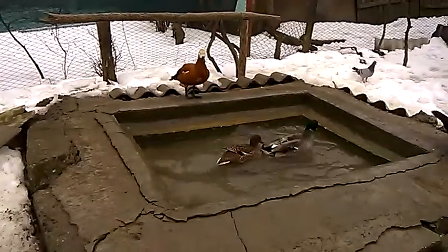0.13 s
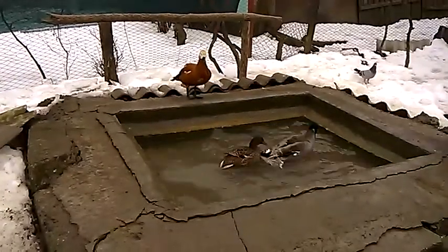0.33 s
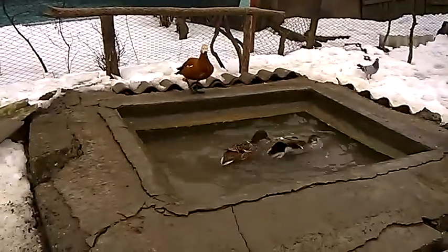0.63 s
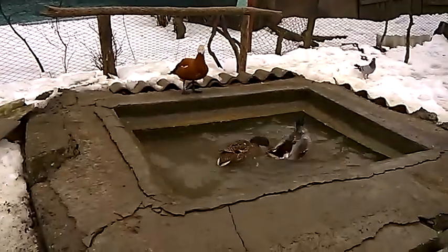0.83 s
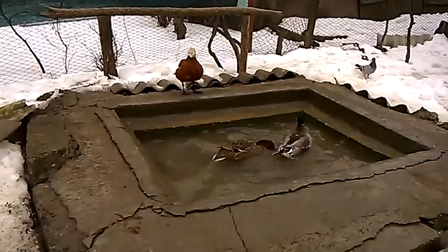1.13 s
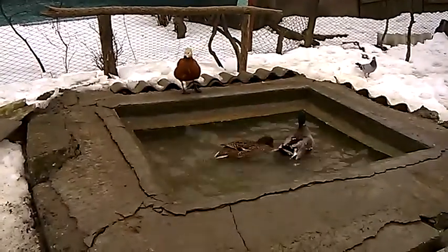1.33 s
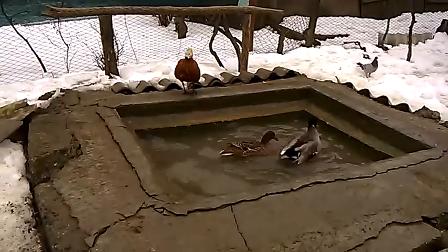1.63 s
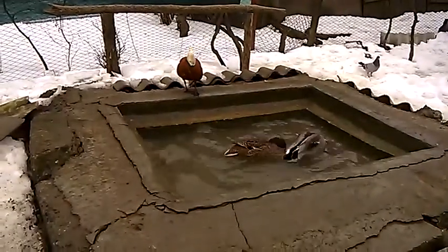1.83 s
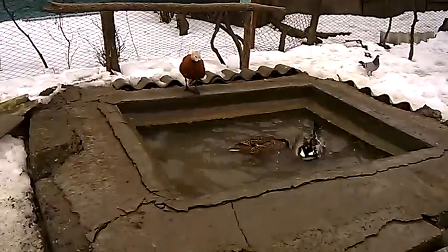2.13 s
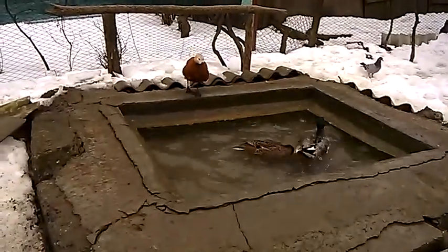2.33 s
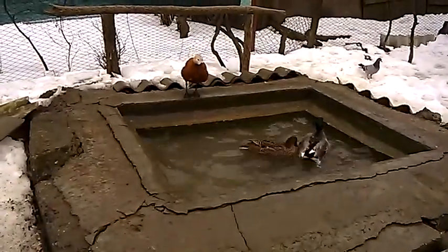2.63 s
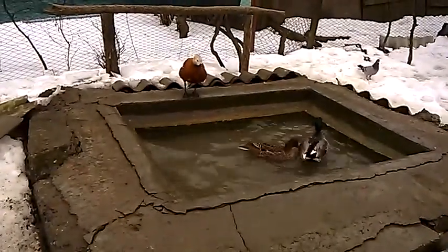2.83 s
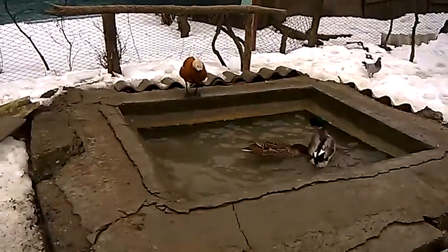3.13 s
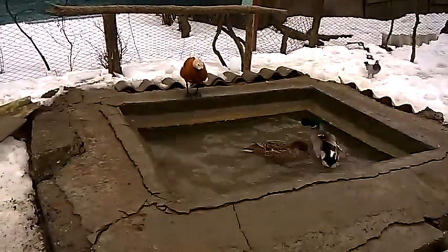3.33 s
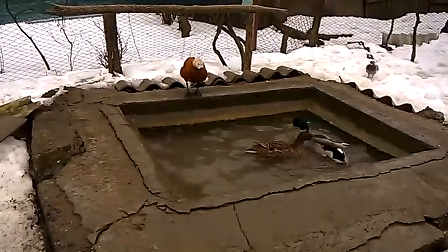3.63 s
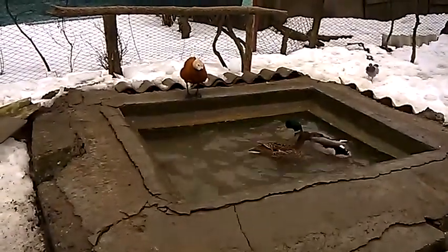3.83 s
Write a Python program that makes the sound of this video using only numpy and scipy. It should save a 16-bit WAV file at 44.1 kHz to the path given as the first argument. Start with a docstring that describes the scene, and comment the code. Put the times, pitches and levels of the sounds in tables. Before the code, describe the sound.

A duck's honk, very loud, is already sounding at the start; a quieter rising honk follows, then a tiny cluck and a third honk, over faint paddling, drips and wind in an outdoor concrete pond.

```python
"""A duck on the rim of a small concrete pond is already honking, with the walls ringing after each call,
two ducks paddling (filtered noise and chirping bubbles) and low wind noise lumping on the microphone.
A distant pigeon coos in gliding sine tone; drips ring as decaying sines, drops tick as noise bursts, and
two-voiced sparrow chirps come from far off. A second honk follows, then a cluck and, near 3 s, a third
honk: each duck call is a harmonic series plus puffs of noise, filtered by the throat."""
import sys
import numpy as np
from scipy import signal
from scipy.fft import rfft, irfft
from scipy.io import wavfile
from scipy.ndimage import uniform_filter1d

SR = 44100
rng = np.random.default_rng(int(sys.argv[2]) if len(sys.argv) > 2 else 0)


def int16_out(signal):
    """Quantize to a 16-bit WAV file."""
    q = np.round(np.clip(np.atleast_2d(signal).T, -1, 1) * 32767)
    wavfile.write(sys.argv[1], SR, q.astype(np.int16))


N = 176400  # 4 s


def amp(db):
    """Decibel law: 20 dB is a factor of ten in amplitude."""
    return 10 ** (np.asarray(db) / 20)


def evened(x):
    """Normalization to unit root mean square."""
    return x / np.sqrt(np.mean(x ** 2) + 1e-20)


def read(points, hz):
    """Interpolation along a logarithmic frequency axis."""
    f, value = np.transpose(points)
    return np.interp(np.log(hz + 1), np.log(f + 1), value)


def along(points):
    """Amplitude envelope, linear in decibels between its points."""
    s, db = np.transpose(points)
    return amp(np.interp(np.arange(N) / SR, s, db))


def add(mix, s, sound):
    """Superposition: adds a sound to the mix, in place, from time s on."""
    part = mix[max(round(s * SR), 0):][:len(sound)]
    part += sound[:len(part)]


def colour(x, points):
    """Linear filtering: multiplies the spectrum of x by a gain curve."""
    f = np.fft.rfftfreq(len(x), 1 / SR)
    return irfft(rfft(x) * amp(read(points, f)), len(x))


def wobble(size, count):
    """Slow random fluctuation: noise averaged twice over size samples, at unit RMS."""
    noise = rng.standard_normal(count)
    return evened(uniform_filter1d(uniform_filter1d(noise, size), size))


def honk(curve, throat, spread):
    """Source-filter principle: voice harmonics and a puff of air each cycle, shaped by the throat."""
    # resonance of windpipe and bill while the bill is shut: f/Hz, relative level/dB
    throat_shut = [(200, -8), (400, -19), (680, -15), (860, 2), (1000, -8), (1200, -15), (1550, -7),
                   (1900, -5), (2200, -32), (2700, -28), (3100, -44), (5500, -34), (10500, -60)]
    shut_hz, open_hz = 235, 300  # the bill opens as the pitch climbs
    treble_hz = 3270
    rasp_db, treble_rasp_db, glide_rasp_db = -37.5, -13, 9  # the last is added at full glide
    jitter, croak_jitter = .006, .018  # RMS share of the pitch; croak while the bill is shut
    croak_db, shimmer_db = 1.8, 4

    s, pitch, level, treble = np.transpose(curve)
    t = np.arange(s[0], s[-1], 1 / SR)
    count = len(t)
    even = np.interp(t, s, pitch)
    bill = np.clip((even - shut_hz) / (open_hz - shut_hz), 0, 1)  # 0 shut, 1 open

    # uneven cycles
    shake = jitter * wobble(size=20, count=count)
    shake = shake + croak_jitter * (1 - bill) * wobble(size=60, count=count)
    turns = np.cumsum(even * (1 + shake)) / SR
    croak = amp(croak_db * (1 - bill) * wobble(size=120, count=count))

    # harmonics; their phases spread with the square of the order
    k = np.arange(1, 60)[:, None]
    harmonic_hz = k * even
    gain_db = bill * read(throat, harmonic_hz) + (1 - bill) * read(throat_shut, harmonic_hz)
    gains = amp(gain_db) * (harmonic_hz < 14000)
    flutter = np.array([wobble(size=300, count=count) for _ in k])
    flutter = flutter * np.clip(harmonic_hz / treble_hz, 0, 1) ** 2.5
    lines = gains * amp(shimmer_db * flutter) * np.cos(2 * np.pi * k * turns - spread * k * k)

    # sum below and above treble_hz, each scaled by its nominal RMS
    above = harmonic_hz >= treble_hz
    low, high = [(lines * part).sum(0) / np.sqrt(((gains * part) ** 2).sum(0) / 2)
                 for part in (~above, above)]

    # air noise decays within each cycle; a sliding pitch moves treble from tone to noise
    slope = abs(uniform_filter1d(np.gradient(even), 900)) * SR  # Hz/s
    glide = np.clip(slope / 900, 0, 1)
    puffs = colour((.4 + np.exp(-(turns % 1) / .3)) * rng.standard_normal(count), throat)
    highpass = signal.butter(4, treble_hz, "high", fs=SR, output="sos")
    high_puffs = signal.sosfilt(highpass, puffs)
    low = low + amp(rasp_db) * evened(puffs)
    high = high * amp(-3 * glide) + amp(treble_rasp_db + glide_rasp_db * glide) * evened(high_puffs)

    # 2 ms attack, absent from a call already sounding at the start; 12 ms release
    attack = (t - s[0] + (s[0] < .01)) / .002
    edge = np.clip(np.minimum(attack, (s[-1] - t) / .012), 0, 1)
    voice = low + amp(np.interp(t, s, treble)) * high
    return s[0], edge * croak * amp(np.interp(t, s, level)) * voice


def pond(x):
    """Reverberation: sparse random-sign echoes of concrete and fence, decaying at a rate set by frequency."""
    # decay of the pond walls: f/Hz, t60/s
    decay = [(300, .35), (800, 0.27), (1500, 0.43), (3000, 0.25), (7000, 0.3)]
    delay_s = .012
    taps, first = np.zeros(SR), round(delay_s * SR)
    at = np.arange(0, SR - 4000, 20)
    taps[first + at + rng.integers(0, 20, len(at))] = rng.choice([-1., 1.], len(at))
    hz, t, z = signal.stft(taps, SR, nperseg=256)
    t60 = np.maximum(read(decay, hz), .03)[:, None]
    tail = signal.istft(z * amp(-60 * t / t60), SR, nperseg=256)[1]
    return signal.fftconvolve(x, tail / np.linalg.norm(tail))[:N]


def water():
    """Bubble acoustics: patchy noise and many rising, damped rings; splashes swell over steady lapping."""
    # lapping: t/s, level/dB
    lapping = [(0, -59.5), (1.2, -61), (1.45, -64.5), (1.8, -61), (2.3, -55), (2.6, -60), (2.7, -63),
               (3.0, -62.5), (4, -63)]
    # spectrum of the paddled water: f/Hz, relative level per Hz/dB
    splash_tone = [(150, -36), (250, -11), (292, -14.5), (456, -8), (1050, -6.5), (1190, -4.5),
                   (2140, -3.5), (10000, -18), (13000, -64), (22000, -120)]
    # single splashes: t/s, length/s, level/dB, spray level relative to the splash/dB
    splashes = [(1.546, 0.055, -67, -8.5), (1.783, 0.049, -52.5, 5), (1.879, 0.056, -56, -4),
                (2.056, .12, -47, -14), (2.2, 0.09, -58, -18), (2.363, 0.036, -51.5, 1),
                (2.473, 0.046, -58, 4.5), (2.574, 0.037, -63.5, -3), (3.625, 0.071, -51.5, -16)]
    patch_db, bubble_db, spray_hz = 3.5, -5, 3500

    hz, _, z = signal.stft(rng.standard_normal(N), SR, nperseg=256)
    patches = uniform_filter1d(rng.standard_normal(z.shape), 3, 0)  # across frequency
    patches = evened(uniform_filter1d(patches, 4, 1))  # across time
    patchy = signal.istft(z * amp(patch_db * patches), SR, nperseg=256)[1][:N]
    fizz = evened(colour(patchy, splash_tone))

    t, bubbles = np.arange(1500) / SR, np.zeros(N)
    for hz in np.geomspace(450, 4500, 24):
        starts = rng.random(N) < 5.0 / SR  # five bubbles a second on average
        train = starts * amp(4.0 * np.minimum(rng.exponential(1, N), 4))
        tone = np.sin(2 * np.pi * hz * t * (1 + 4.0 * t))
        ring = tone * np.exp(-t * hz / 11.0) * np.minimum(t / 0.0008, 1)
        bubbles += amp(read(splash_tone, hz)) * signal.oaconvolve(train, ring)[:N]

    level = along(lapping)
    spray = level.copy()
    for s, length, db, spray_db in splashes:
        u = np.arange(0, length, 1 / SR) / length
        swell = amp(db) * np.sin(np.pi * u ** 0.68)  # rises faster than it falls
        add(level, s, swell)
        add(spray, s, amp(spray_db) * swell)
    both = fizz + amp(bubble_db) * evened(bubbles)
    low = signal.sosfiltfilt(signal.butter(2, spray_hz, fs=SR, output="sos"), both)
    return level * low + spray * (both - low)


def wind():
    """Turbulent pressure on the microphone: lumpy low-frequency noise and heavily damped knocks."""
    # wind strength: t/s, level/dB
    gusts = [(0.04, -60.5), (0.72, -62), (0.8, -52.5), (0.92, -53.5), (1.09, -68.5), (1.75, -58.5),
             (1.8, -49), (1.83, -62), (1.86, -55.5), (1.99, -60), (2.04, -54), (2.06, -54.5), (2.16, -58.5),
             (2.19, -61.5), (2.37, -48.5), (2.73, -65.5), (3.84, -59.5), (4.0, -64.5)]
    # wind spectrum: f/Hz, relative level per Hz/dB
    wind_tone = [(12, -45), (20, -9.5), (75, 0), (135, -2.5), (334, -11.5), (443, -9.5), (500, -8.5),
                 (650, -46), (1100, -120)]
    # wind knocks: t/s, level before damping/dB, f/Hz
    thumps = [(1.553, -39, 143), (1.792, -39.5, 99.6), (1.854, -40, 70.0), (1.905, -35, 84),
              (2.028, -39.5, 81.3), (2.147, -44, 76), (2.341, -49, 137), (2.37, -29, 150)]
    lump_db = 1.5
    rumble = colour(rng.standard_normal(N), wind_tone)
    out = along(gusts) * evened(rumble * amp(lump_db * wobble(size=700, count=N)))
    t = np.arange(3000) / SR
    for s, db, hz in thumps:
        add(out, s, amp(db) * np.sin(2 * np.pi * hz * t) * np.exp(-t * hz / 0.89))
    return out


def birds():
    """Frequency modulation: a slightly falling pigeon coo and arched or rising two-voiced sparrow chirps."""
    # sparrow chirps: t/s, length/s, level/dB, first f/Hz, middle f/Hz, last f/Hz (upper voice)
    chirps = [(0.527, 0.084, -59.5, 3000, 3690, 2820), (2.772, 0.0336, -57, 3840, 4100, 4330),
              (2.795, .035, -48.5, 3970, 4660, 3300), (2.835, .07, -50, 3010, 3810, 2960),
              (3.896, 0.066, -66.5, 3660, 4000, 3720)]
    # distant pigeon: start t/s, end t/s, level/dB, first f/Hz, last f/Hz
    coo = (.2, .76, -58, 622, 597)
    lower_voice, rough, pitch_jitter = .86, .8, .025  # frequency ratio, RMS shares of level and pitch
    out = np.zeros(N)
    for s, length, db, first, middle, last in chirps:
        u = np.arange(0, length, 1 / SR) / length
        ends = np.where(u < .5, first, last)
        pitch = ends + (middle - ends) * np.sin(np.pi * u)
        turns = np.cumsum(pitch * (1 + pitch_jitter * wobble(size=60, count=len(u)))) / SR
        pair = sum(np.sin(2 * np.pi * ratio * turns) * (1 + rough * wobble(size=120, count=len(u)))
                   for ratio in (1, lower_voice))
        add(out, s, amp(db) * pair * np.sin(np.pi * u) ** .5)

    start, end, db, first, last = coo
    length = end - start
    t = np.arange(0, length, 1 / SR)
    tone = signal.chirp(t, first, length, last)
    add(out, start, amp(db) * tone * np.sin(np.pi * t / length) ** .4)
    return out


def drops():
    """Damped resonance: drips ring as bubbles of rising pitch; impact ticks are short bursts of treble."""
    # drips that ring as bubbles: t/s, level before damping/dB, first f/Hz
    drips = [(0.389, -48, 2200), (0.411, -46, 1780), (0.644, -43, 943), (0.703, -41, 2560),
             (0.733, -41, 1920), (1.141, -34.5, 1770), (1.295, -42.5, 1408), (1.35, -49, 1826),
             (1.878, -42.5, 2500), (2.037, -27.5, 2540), (2.228, -33, 2600), (2.247, -37.5, 1805),
             (2.263, -47, 915), (2.397, -36, 2540), (2.421, -37, 2580), (2.484, -41.5, 1638),
             (2.509, -46, 1530), (2.59, -46.5, 1940), (2.695, -40.5, 2020), (2.761, -45, 1420),
             (2.85, -46, 1330), (2.881, -41, 922), (3.657, -39, 1756), (3.768, -49, 1310)]
    # drops that tick on water and concrete: t/s, reference level/dB, centre f/Hz
    ticks = [(0.411, -44, 3000), (0.4174, -41.5, 4570), (0.4424, -50, 3680), (0.5018, -31.5, 4200),
             (0.5079, -33, 4080), (0.5244, -45, 3110), (0.5734, -34, 3260), (1.1197, -26, 5050),
             (1.1744, -27.5, 6430), (1.2296, -36.5, 5780), (1.286, -29.5, 5150), (1.347, -42, 7300),
             (1.3655, -45, 4150), (1.7938, -42.5, 3365), (1.9065, -58, 3420), (2.0385, -26, 3420),
             (2.1331, -40, 3150), (2.1884, -35.5, 5840), (2.2285, -40, 3330), (2.3734, -32, 3050),
             (2.4792, -34.5, 3240), (2.5984, -54.5, 3140), (2.6928, -37.5, 5660), (2.7614, -37, 4200),
             (3.0494, -50.5, 3370), (3.6315, -55, 3050), (3.658, -53, 3220)]
    drip_cycles, drip_glide = 10.4, .02  # cycles to fall to 1/e, phase stretch in that time
    tick_s, tick_width = 0.0028, .17  # decay to 1/e, half width in natural-log frequency
    snap_db, snap_s = 0, .0006  # wide click at the start of each tick, decay to 1/e
    out, t = np.zeros(N), np.arange(2500) / SR
    for s, db, hz in drips:
        u = t * hz / drip_cycles
        ring = np.sin(2 * np.pi * hz * t * (1 + drip_glide * u)) * np.exp(-u)
        add(out, s, amp(db) * ring * np.minimum(t / 0.00075, 1))

    f = np.fft.rfftfreq(len(t), 1 / SR) + 1
    noises = rng.standard_normal((len(ticks), len(t)))
    for (s, db, hz), noise in zip(ticks, noises):
        resonance = 1 / (1 + (np.log(f / hz) / tick_width) ** 2)
        burst = evened(irfft(rfft(noise) * resonance, len(t)))
        add(out, s, amp(db + snap_db - 10) * np.diff(noise) * np.exp(-t[1:] / snap_s))
        add(out, s, amp(db - 9.5) * burst * np.exp(-t / tick_s) * np.minimum(t / 0.00017, 1))
    return out


def scene():
    """Superposition of direct sounds and wall reverberation, the same in both channels."""
    # duck calls: t/s, pitch f/Hz, level/dB, treble level relative to the rest/dB
    near_honk = [(0.0, 415.2, -10.5, -26.5), (0.022, 423.7, -11, -29), (0.102, 438.9, -9, -33.5),
                 (0.134, 432.7, -14, -31.5), (0.166, 393.3, -25, -19), (0.176, 360.7, -33.5, -21),
                 (0.202, 273.2, -38.5, -27.5), (0.226, 253.3, -50, -22), (0.25, 219.7, -60, -12)]
    honk_2 = [(0.768, 191.4, -39, -30), (0.776, 203.2, -32, -32), (0.806, 220.9, -26.5, -28.5),
              (0.82, 252.6, -25.5, -28.5), (0.83, 253.8, -31, -36), (0.872, 300.8, -22.5, -22.5),
              (0.932, 374.7, -22, -22), (0.95, 389, -23, -17), (0.996, 392.4, -18, -22.5),
              (1.008, 400.4, -23, -19), (1.056, 385.3, -27, -29), (1.085, 348.6, -34, -20)]
    cluck = [(1.737, 188, -43.5, -37.5), (1.748, 184.9, -31, -42), (1.767, 191.4, -37.5, -42),
             (1.785, 217, -45, -35), (1.8, 222, -37, -35)]
    honk_3 = [(3.1, 198.6, -50, -35), (3.114, 209, -31, -41), (3.132, 214.7, -29, -22.5),
              (3.146, 255, -27.5, -34), (3.162, 260.4, -33.5, -33), (3.202, 295.2, -26, -22),
              (3.236, 326, -22, -18), (3.312, 394.9, -24.5, -22), (3.358, 406.7, -17.5, -25.5),
              (3.378, 407.6, -18.5, -21.5), (3.44, 373.7, -31, -27), (3.46, 377, -30.5, -23)]
    # windpipe and bill, turned to the microphone and turned away: f/Hz, relative level/dB
    throat_facing = [(200, -3), (440, -18.5), (870, -12), (1200, -1.5), (1320, 2.5), (1620, -2),
                     (1770, -25), (2050, -21), (2200, -9), (2650, -29.5), (3300, -46), (4400, -42.5),
                     (5000, -43), (5700, -42), (7500, -44), (8500, -60), (13000, -56)]
    throat_away = [(180, 3), (380, -11), (600, -13.5), (800, 0), (1130, -7.5), (1500, 2.5), (1650, 7),
                   (2050, -12), (2250, -17.5), (2750, -18.5), (3050, -33), (3600, -39), (4600, -30.5),
                   (5600, -27.5), (6600, -34), (7900, -39), (8600, -51), (10500, -55)]
    # level sent to the walls by each source, dB
    near_pond_db, pond_db, drop_pond_db, far_pond_db = -14, -8.5, -11.5, -7

    near, duck = np.zeros(N), np.zeros(N)
    add(near, *honk(near_honk, throat_facing, .6))
    # phase spread: small gives sharp pulses
    for curve, spread in ((honk_2, .3), (cluck, .08), (honk_3, .3)):
        add(duck, *honk(curve, throat_away, spread))
    small, far = drops(), birds()
    calls = amp(near_pond_db) * near + amp(pond_db) * duck
    walls = pond(calls + amp(drop_pond_db) * small + amp(far_pond_db) * far)
    mix = near + duck + small + far + walls + water() + wind()
    return np.array([mix, mix])


def record(dry):
    """Additive noise and band limiting: microphone hiss, then a linear-phase low-pass."""
    # hiss spectrum: f/Hz, relative level per Hz/dB
    hiss_tone = [(180, -28.5), (300, -10), (600, -7), (1350, -14.5), (2000, -19.5), (3800, -22),
                 (6000, -33), (9000, -28.5), (10500, -14.5), (12500, -13), (15700, -15)]
    hiss_db, edge_hz = -59, 15750
    hiss = amp(hiss_db) * evened(colour(rng.standard_normal(N), hiss_tone))
    lowpass = signal.firwin(1023, edge_hz, window=("kaiser", 9), fs=SR)
    return signal.oaconvolve(dry + hiss, lowpass[None], "same")


dry = scene()
out = record(dry)
int16_out(out)
```